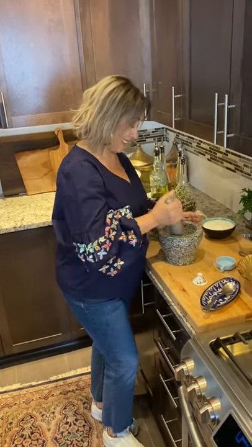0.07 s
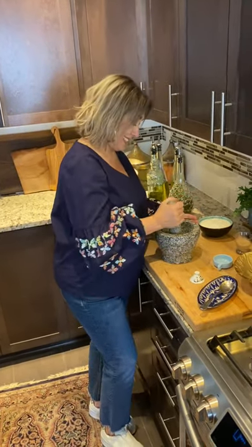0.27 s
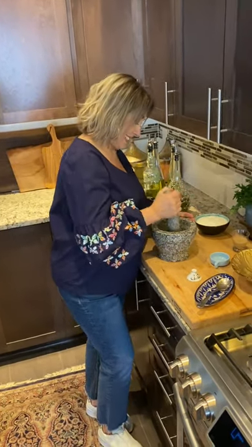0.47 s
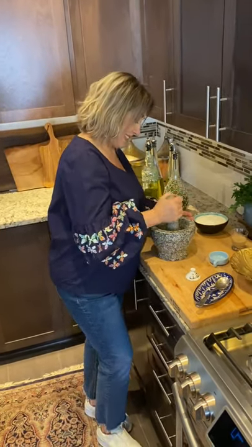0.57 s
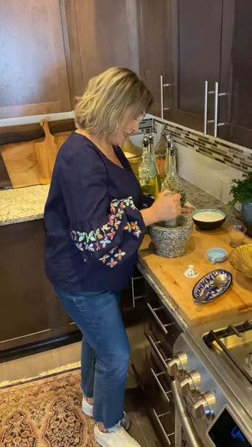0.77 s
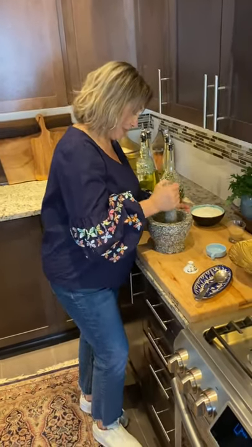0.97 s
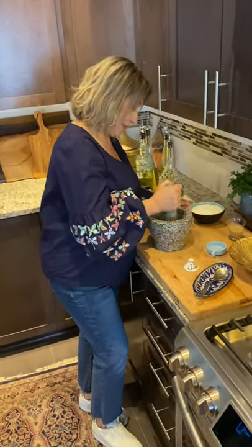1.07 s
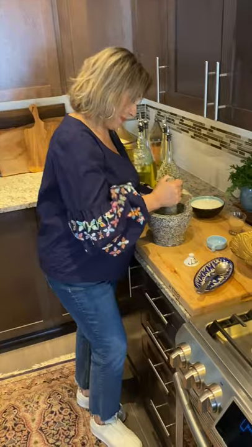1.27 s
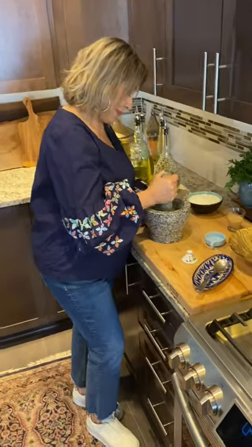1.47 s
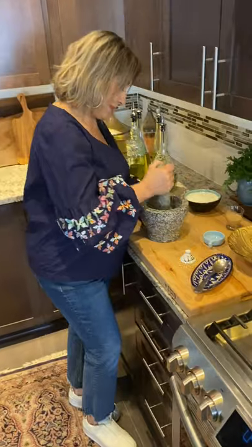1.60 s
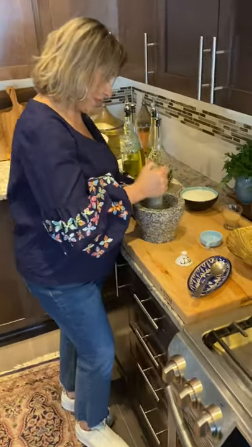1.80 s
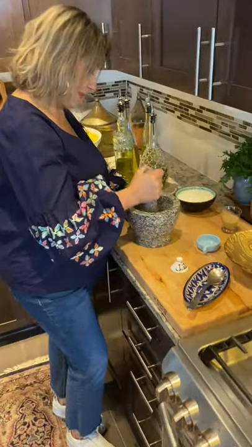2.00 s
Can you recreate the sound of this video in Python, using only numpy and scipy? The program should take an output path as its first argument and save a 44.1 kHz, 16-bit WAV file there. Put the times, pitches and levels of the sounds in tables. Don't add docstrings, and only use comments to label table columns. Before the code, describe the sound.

Mortar and pestle close by in a small live kitchen: first a clipped, ringing stone strike with rattling glass, then evenly spaced dull thumps with salty crunches, growing heavier over faint fridge hum.

```python
import sys
import numpy as np
from scipy import signal
from scipy.fft import rfft, irfft, next_fast_len
from scipy.io import wavfile

SR = 44100
rng = np.random.default_rng(int(sys.argv[2]) if len(sys.argv) > 2 else 0)


def gain_from_db(level_db):
    decades = np.asarray(level_db, float) / 20
    return 10 ** decades


def to_wav(sig):
    pcm = np.clip(np.atleast_2d(sig), -1, 1) * 32767
    pcm = np.round(pcm).astype(np.int16)
    wavfile.write(sys.argv[1], SR, pcm.T)


N = 90404
T = np.arange(SR // 2) / SR
WET_DB = -17.5

# [Hz, dB]
SALT_SPECTRUM = [(710, -48), (1200, -5.5), (3470, -0.5), (4130, -0.5), (6100, 3), (11000, -3), (15500, -9),
                 (16600, -20)]


def unit(x):
    return x / np.sqrt(np.mean(x ** 2) + 1e-20)


def along(points, hz):
    f, v = np.transpose(points)
    return np.interp(np.log(hz + 1), np.log(f + 1), v)


def filtered(x, response):
    m = next_fast_len(len(x) + 8192)
    return irfft(rfft(x, m) * response(np.fft.rfftfreq(m, 1 / SR)), m)[:len(x)]


def hiss(spectrum, size):
    return unit(filtered(rng.standard_normal(size), lambda hz: gain_from_db(along(spectrum, hz))))


def resonances(peaks):
    def response(f):
        total = 0
        for k, (hz, width_hz, db) in enumerate(peaks):
            damping = 1j * f * width_hz
            total = total + (-1) ** k * gain_from_db(db) * damping / (hz * hz - f * f + damping)
        return total
    return response


def ringing(modes, spread_db):
    out = np.zeros(len(T))
    for hz, db, t60_s in modes:
        decay = gain_from_db(db + spread_db * rng.standard_normal() - 60 * T / t60_s)
        wander_rad = np.cumsum(0.035 * rng.standard_normal(len(T)))
        out += decay * np.sin(2 * np.pi * (hz * T + rng.random()) + wander_rad)
    return out


def room(x, wet_db):
    # [Hz, s]
    kitchen = [(60, 0.77), (300, 0.5), (1000, 0.49), (4000, 0.4), (12000, 0.29)]
    hz, t, z = signal.stft(rng.standard_normal(SR // 2), SR, nperseg=512)
    decay = gain_from_db(-60 * t / along(kitchen, hz)[:, None])
    tail = signal.istft(z * decay, SR, nperseg=512)[1]
    delayed = np.pad(x, (180, 0))
    wet = signal.fftconvolve(delayed, tail / np.linalg.norm(tail))
    return np.pad(x, (0, len(wet) - len(x))) + gain_from_db(wet_db) * wet


def add(track, s, x):
    part = track[max(round(s * SR), 0):][:len(x)]
    part += x[:len(part)]


def air():
    # [Hz, dB]
    air_spectrum = [(25, 7.5), (65, 5), (225, -3.5), (330, -2.5), (900, -6.5), (1500, -17.5), (2200, -16.5),
                    (3200, -24.5), (16000, -42.5)]
    # [Hz, dB]
    hum_lines = [(59, -45.5), (285, -53.5), (506, -51.5), (894, -53.5)]
    # [s, dB, s]
    rustles = [(1.142, -61.5, .06), (1.34, -59.5, 0.03)]
    t = np.arange(N) / SR
    out = gain_from_db(-42) * hiss(air_spectrum, N)
    for hz, db in hum_lines:
        line = filtered(rng.standard_normal(N), resonances([(hz, 3.5, 0)]))
        out += gain_from_db(db) * unit(line)
    echo_spectrum = [(200, -20.0), (800, 2.0), (2200, -9.5), (5000, -26), (14000, -33.5)]
    out += gain_from_db(-41 - 60 * t / 0.5) * hiss(echo_spectrum, N)
    swell = sum(gain_from_db(db) * np.exp(-((t - s) / spread_s) ** 2) for s, db, spread_s in rustles)
    return out + swell * hiss([(1500, -20), (5000, 1.5), (15000, -4.5)], N)


def ticks():
    # [s, dB, Hz, cycles]
    clicks = [(.118, -46, 9640, 3), (0.1518, -22.5, 930, 1.9), (0.152, -41, 4590, 6),
              (0.1535, -38, 2440, 10), (0.166, -23, 1770, 1.4), (0.171, -55, 4450, 13),
              (0.18, -44, 4730, 13), (.195, -55.5, 4600, 23), (0.213, -48, 4340, 17),
              (.228, -57.5, 4620, 12), (1.039, -60, 10500, 60), (1.336, -35, 9800, 3.6),
              (1.356, -51, 9600, 9.2), (1.3766, -45.5, 7900, 14), (1.3768, -46.5, 10000, 12),
              (1.379, -56, 13000, 15), (1.4925, -57, 10600, 30), (1.7254, -16, 2420, 2.2),
              (1.98, -34, 4000, 1.6), (.767, -19, 821, 6.9), (1.7472, -7, 877, 2.6), (1.7507, -4.5, 845, 3),
              (1.248, -15.5, 752, 1.1), (1.2495, -28, 1300, 2.9), (1.224, -28, 4470, 8),
              (1.229, -31, 4640, 12), (1.2345, -29, 3100, 6)]
    out = np.zeros(N)
    t = T[:8192]
    for s, db, hz, cycles in clicks:
        wander_rad = np.cumsum(0.048 * rng.standard_normal(len(t)))
        envelope = np.exp(-t * hz / cycles) * (1 - np.exp(-t * hz / 0.6))
        click = np.sin(2 * np.pi * hz * t + wander_rad) * envelope
        add(out, s, gain_from_db(db) * room(click, WET_DB))
    return out


def bottles():
    # f/Hz, level/dB, t60/s [Hz, dB, s]
    small = [(5964, 2, .09), (5916, -12, 0.2), (7919, -8, 0.12), (6300, -9, 0.1)]
    cruet = [(8748, -7, .1), (12910, -3, .15), (14600, -8, .04), (15320, -4, .14), (12400, -10, .14)]
    tall = [(3074, -9, .1), (4344, -12, .22), (4716, 2, .11), (5012, -14, .22), (6907, -4, .15),
            (7020, -10, .18), (7171, -10, .2)]
    jar = [(3900, -6, 0.037), (4800, 0.5, .045), (5300, -13, .03), (5880, -7, .04), (7250, 0, 0.036),
           (7870, -13, 0.099), (9500, -24.5, 0.39), (9750, -4.5, .03), (10900, -16, 0.044),
           (12920, -17, 0.087), (15380, -13, .06)]
    lid = [(3000, 5, 0.036), (3216, 9, .03), (3340, 8, .03)]
    cruet_late = [(9631, -2, .12), (10050, -8, .08), (10800, 0, .18), (8100, -6, .08)]
    # t/s, level/dB [s, dB]; cruet_late_clinks start the cruet's later modes
    small_clinks = [(0.2565, -28), (0.2693, -17), (0.2824, -21), (0.357, -33), (0.446, -46)]
    cruet_clinks = [(.2745, -26.5), (.288, -30), (.335, -45.5)]
    tall_clinks = [(.2825, -13), (.2995, -25), (.352, -36)]
    jar_clinks = [(1.753, -28), (1.758, -29.5), (1.766, -34), (1.772, -34.5), (1.786, -45), (1.8, -52)]
    lid_clinks = [(1.7467, -37), (1.7501, -31), (1.753, -37), (1.7582, -43)]
    cruet_late_clinks = [(.2875, -29.5), (.305, -30.5)]
    # [Hz, dB]
    chatter = [(1200, -20.5), (2500, 2), (6000, -5.5), (15000, -35.5)]
    vessels = ((small, small_clinks), (cruet, cruet_clinks), (tall, tall_clinks),
               (jar, jar_clinks), (lid, lid_clinks), (cruet_late, cruet_late_clinks))
    onset = 1 - np.exp(-T / 0.00072)
    out = np.zeros(N)
    for modes, clinks in vessels:
        for s, db in clinks:
            touch = gain_from_db(-0.5 - 60 * T / 0.04) * hiss(chatter, len(T))
            clink = (ringing(modes, spread_db=-0.6) + touch) * onset
            add(out, s, gain_from_db(db) * room(clink, wet_db=-15))
    return out


def rocking():
    # [s, dB, s, dB per octave]
    rocks = [(0.521, -37, 0.035, -9), (0.756, -29.5, 0.027, -3), (0.765, -25.5, 0.014, -8),
             (0.784, -33, 0.018, -5.5), (0.994, -28, 0.027, -1.5), (1.017, -37.5, 0.068, -11.5),
             (1.219, -24.5, 0.035, -1), (1.247, -24.5, 0.031, -8), (1.271, -61, 0.019, -22.5),
             (1.462, -24.5, 0.026, -3), (1.729, -32, 0.0074, 3.5), (1.736, -19.5, 0.0067, -1.5),
             (1.751, -23, 0.0098, -1.5), (1.76, -23.5, 0.027, 1.5), (1.991, -23, 0.016, -2.5),
             (2.005, -25, 0.0078, -5.5)]
    # [Hz, Hz, dB]
    board = [(176, 33.5, -1.5), (281.4, 47, 2.5), (350.7, 53, 6), (479, 88, 0.5), (552, 64, 2.5),
             (700, 145, 1), (838, 111, 3), (973, 91, -5), (1300, 200, -10.5)]
    out = np.zeros(N)
    for s, db, length_s, tilt_db in rocks:
        sparse = rng.standard_normal(len(T)) * (rng.random(len(T)) < 0.06)
        contacts = sparse * np.exp(-(T / length_s) ** 2)
        tilted = [(hz, width_hz, g + tilt_db * np.log2(hz / 500)) for hz, width_hz, g in board]
        ring = filtered(contacts, resonances(tilted))
        add(out, s, gain_from_db(db + 10) * room(ring / np.abs(ring).max(), wet_db=-14))
    return out


def bang():
    # [Hz, dB]
    stone = [(100, -48.5), (250, -25), (450, -6.5), (805, -3), (2400, -8.5), (3620, -15.5), (7000, -22),
             (16000, -43.5)]
    # [Hz, dB, s]
    bowl = [(375, -13, 0.14), (506, -14, .2), (562, -5, 0.2), (632, -10, .15), (715, -6, .16),
            (769, -3, 0.13), (833, -4, .16), (881, -6, 0.12), (934, -4, 0.15), (1026, -8, 0.08),
            (1220, -12, 0.13), (1970, -14, .12)]
    # [Hz, dB, s]
    rim = [(2370, 3, .04), (3100, -14, .1), (2000, -10, .15)]
    # [s, dB, ratio]
    bounces = [
        (.2457, 3, 0.79),
        (.2615, -0.5, 0.26),
        (.2715, -4, 0.36),
        (.281, 0, 0.25),
        (.294, -14.5, 1.2),
        (.311, -13, .7),
        (.320, -23, 1.),
    ]
    bowl_db, settle_s, settle_db = -8.5, 0.2895, -13.5
    dry = np.zeros(N)
    for s, db, share in bounces:
        ring = ringing([(hz, g, share * t60_s) for hz, g, t60_s in bowl], spread_db=2.0)
        if s < settle_s:
            ring = ring * gain_from_db(settle_db * np.clip((T + s - settle_s) / 0.0017, 0, 1))
        add(dry, s, gain_from_db(bowl_db + db) * ring * np.clip(T / 0.00063, 0, 1))
    rattle = 0.38 * hiss(stone, len(T)) * (gain_from_db(-60 * T / 0.18) + gain_from_db(3.5 - 60 * T / 0.012))
    strike = rattle + gain_from_db(bowl_db) * ringing(rim, spread_db=6.5)
    add(dry, 0.2457, strike * np.clip(T / 0.0003, 0, 1))
    return gain_from_db(9) * room(dry, wet_db=-14)[:N]


def cracks():
    # [s, dB]
    crystals = [(0.5168, -26.5), (0.515, -22), (.7505, -22.5), (.753, -18.5), (0.7545, -29.5), (0.986, -29),
                (0.99, -32), (1.2154, -30), (1.217, -20.5), (1.2248, -32.5), (1.23, -36.5), (1.244, -35),
                (1.252, -34), (1.4537, -34), (1.4561, -31.5), (1.4631, -39.5), (1.468, -34),
                (1.4792, -34.5), (1.726, -38), (1.73, -30.5), (.153, -45), (.168, -51), (1.7569, -33),
                (1.7655, -33.5), (1.774, -39), (1.9832, -19), (1.985, -21)]
    out = np.zeros(N)
    decay = gain_from_db(-60 * T[:2048] / 0.005)
    for s, db in crystals:
        add(out, s, gain_from_db(db - 1.5) * room(hiss(SALT_SPECTRUM, 2048) * decay, WET_DB))
    return out


def counter_thump():
    # [Hz, ratio, s]
    counter = [(57, -.1, .24), (64, -.05, .9), (95, .49, .105), (135, .48, .108), (182, -.47, .03),
               (185, .42, .22), (364, -1., .03)]
    push_s = 0.0094
    push = np.gradient(np.sin(np.pi * np.clip(T / push_s, 0, 1)) ** 2)
    ring = sum(g * np.sin(2 * np.pi * hz * T) * gain_from_db(-60 * T / t60_s) for hz, g, t60_s in counter)
    thump = signal.fftconvolve(push, ring)[:len(T)]
    return thump / np.abs(thump).max()


def blows():
    # [s, dB, dB, s, dB]
    pestle_blows = [
        (0.261, -7.5, -32, 0.0012, -2.5),
        (0.5137, -17, -23.5, 0.0046, -0.5),
        (0.749, -11.5, -24.5, 0.0086, -3),
        (0.986, -11.5, -22, 0.0056, -1.5),
        (1.2155, -10.5, -32, 0.0046, 12),
        (1.4556, -12, -31, 0.0054, 9),
        (1.7286, -7.5, -32, 0.0094, 10),
        (1.9839, -9.5, -28, 0.0056, 7),
    ]
    out = np.zeros(N)
    thump = counter_thump()
    for s, thump_db, crunch_db, length_s, grind_db in pestle_blows:
        add(out, s, gain_from_db(thump_db) * room(thump, wet_db=-13.0))
        steps = np.repeat(rng.standard_normal(len(T) // 20 + 1), 20)[:len(T)]
        grains = unit(gain_from_db(1.7 * steps) * hiss(SALT_SPECTRUM, len(T)))
        landing = (T / length_s * np.exp(1 - T / length_s)) ** 5.8
        grind = gain_from_db(-7.5 + grind_db - 60 * T / 0.12) * np.clip(T / 0.002, 0, 1)
        crunch = room(grains * (landing + grind), WET_DB)
        add(out, s - 0.69 * length_s + 0.00083, gain_from_db(crunch_db - 6.5) * crunch)
    return out


def scene():
    return (air() + ticks() + bottles() + rocking() + bang() + cracks() + blows())[None]


def band_limit(x):
    return signal.sosfilt(signal.butter(12, 20000, fs=SR, output="sos"), x)


def record(dry):
    ceiling, knee, top_hz = 1.02, 20.0, 15950
    clipped = dry / (1 + np.abs(dry / ceiling) ** knee) ** (1 / knee)

    def top_cut(hz):
        return np.where(hz < top_hz, 1, gain_from_db(-12.5 - 6 * (hz - top_hz) / 1000))

    mix = filtered(clipped[0], top_cut)[None]
    return band_limit(mix)


dry = scene()
out = record(dry)
to_wav(out)
```